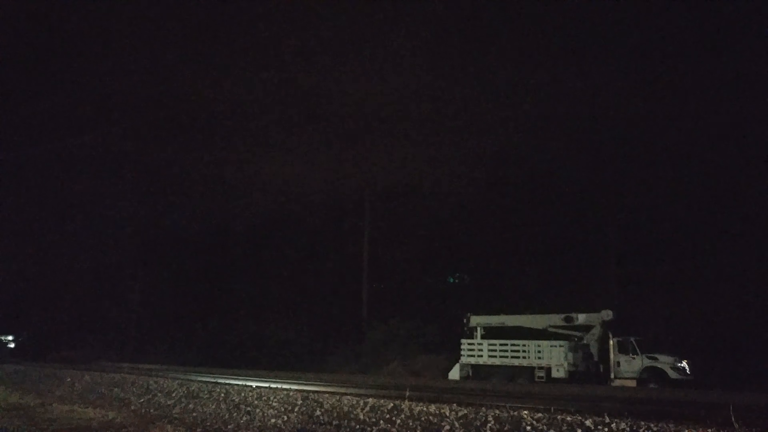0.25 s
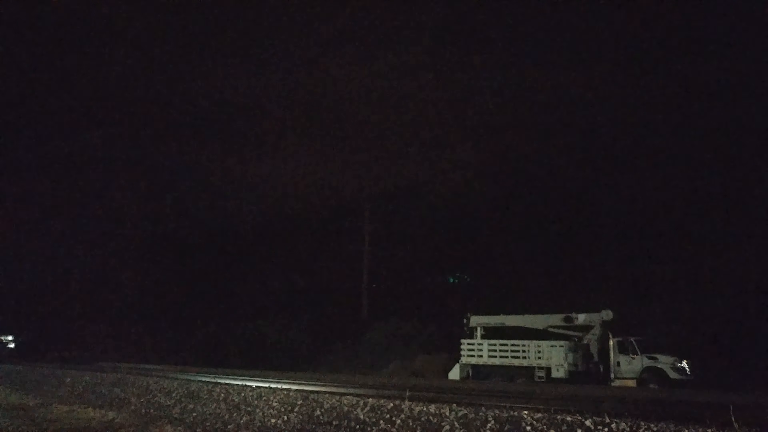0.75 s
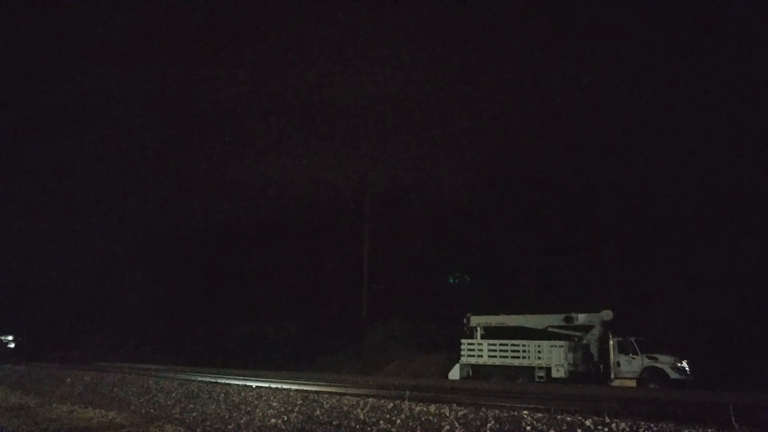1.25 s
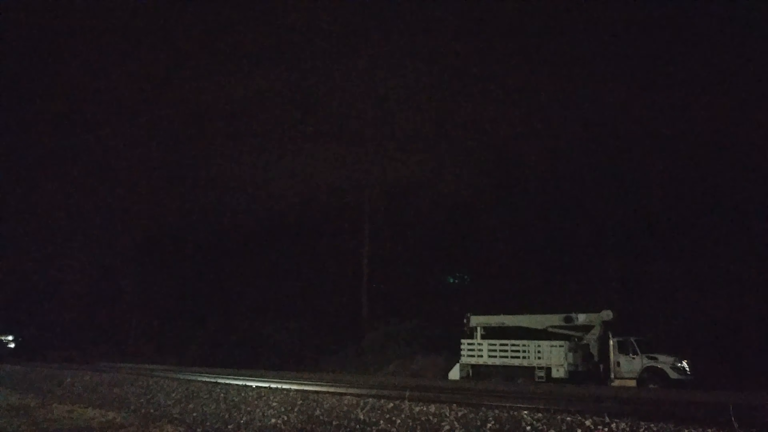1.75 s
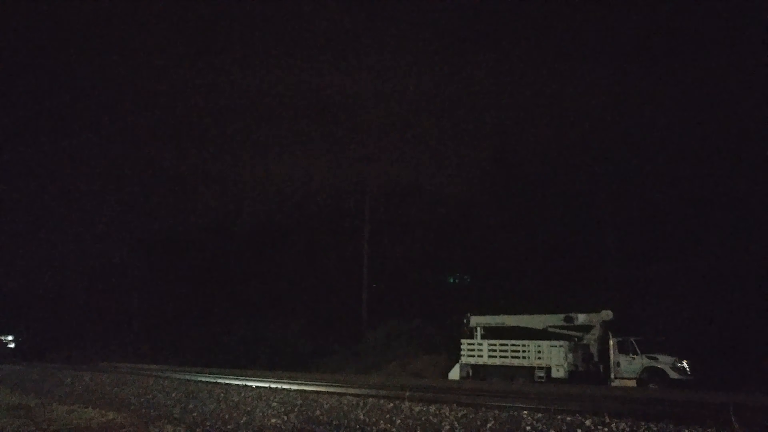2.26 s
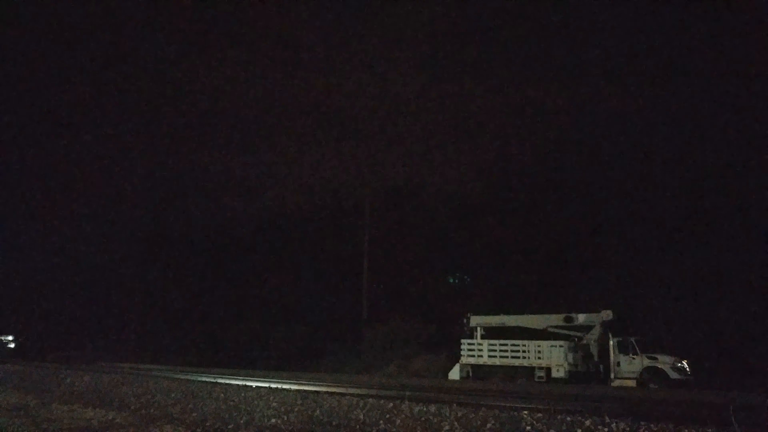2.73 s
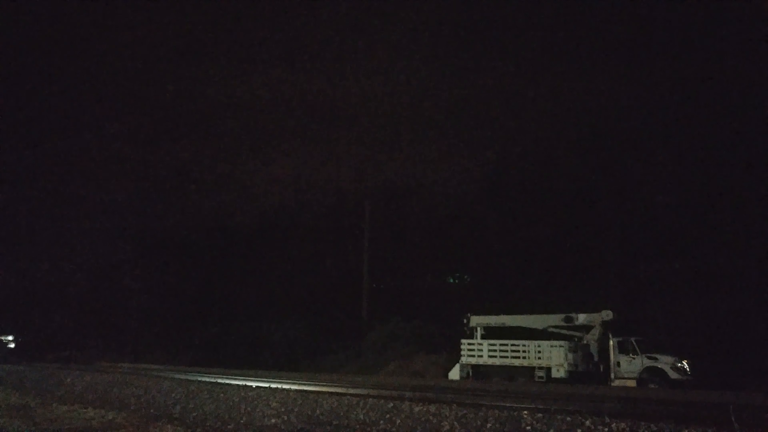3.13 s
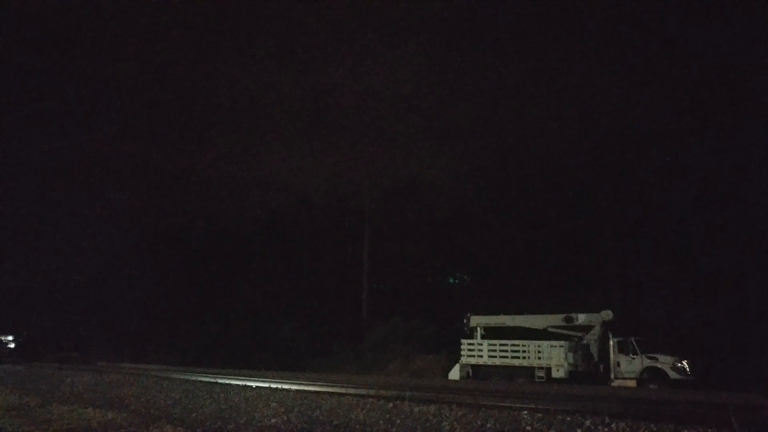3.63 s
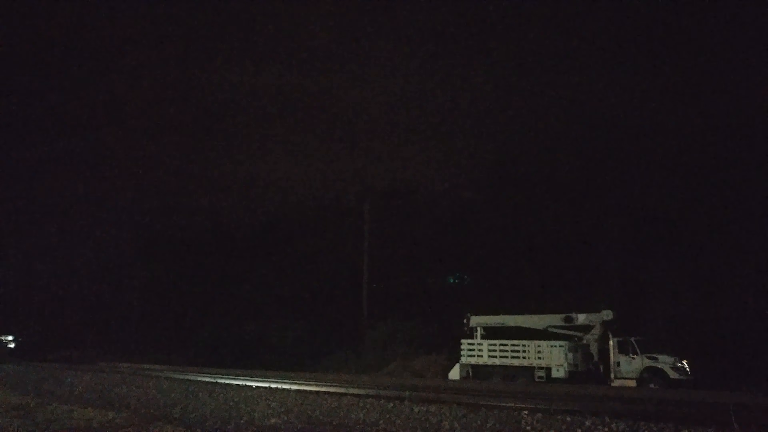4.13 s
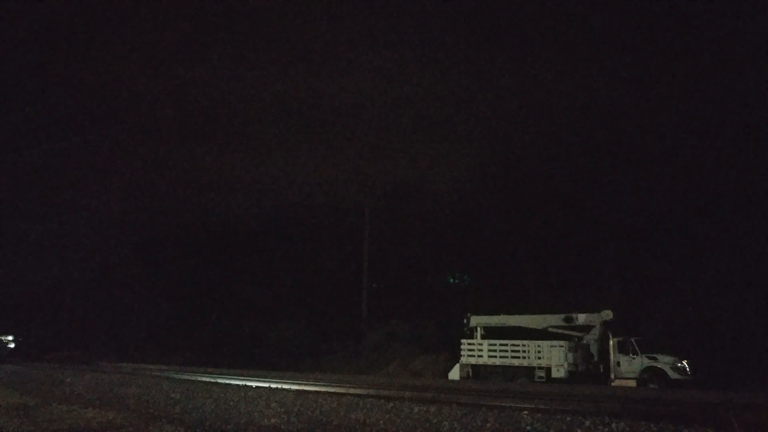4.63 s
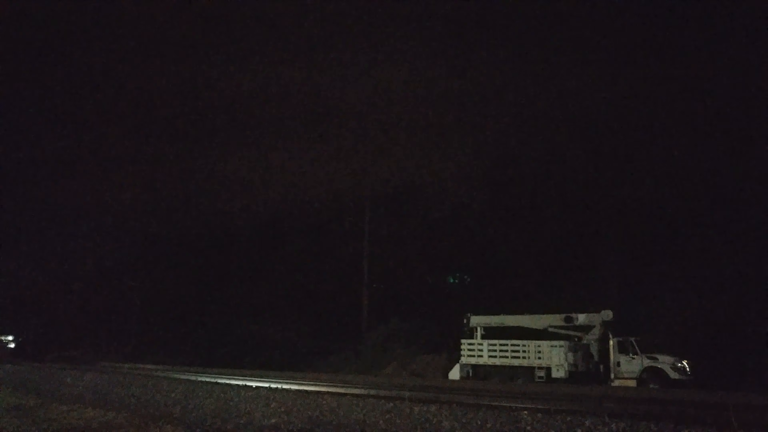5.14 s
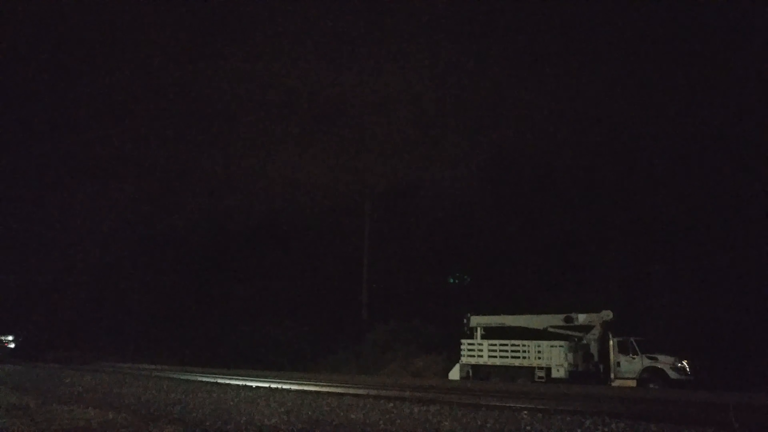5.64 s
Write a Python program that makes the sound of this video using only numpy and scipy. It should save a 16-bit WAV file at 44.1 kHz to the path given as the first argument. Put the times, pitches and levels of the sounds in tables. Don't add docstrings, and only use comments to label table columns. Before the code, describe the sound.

Deep rapid diesel throbbing from a distant rail machine, wavering hum and grinding hiss around it, heard almost only on the right.

```python
import sys
import numpy as np
from scipy import signal
from scipy.fft import rfft, irfft, next_fast_len
from scipy.io import wavfile
from scipy.ndimage import uniform_filter1d, map_coordinates

SR = 44100
rng = np.random.default_rng(int(sys.argv[2]) if len(sys.argv) > 2 else 0)


def attenuation_scalar(level_db):
    decades = np.asarray(level_db, float) / 20
    return 10 ** decades


def wav_out(sig):
    wavfile.write(sys.argv[1], SR, np.round(np.clip(np.atleast_2d(sig).T, -1, 1) * 32767).astype(np.int16))


N = 259244

# order/crank rate, level/dB
PIPE_LINES = [(9, -59), (12, -55), (14, -56.5), (16, -52.5), (19, -61), (24, -53.5), (25, -60), (26, -59.5)]
# order/crank rate, level/dB, sign
PULSE_LINES = [(3, -43, 1), (6, -48, -1), (7, -43, 1), (8, -44.5, -1)]
# beat/Hz, first in step t/s, level/dB
ABOVE_FOURTH = [(2.3, 0.033, -39.5), (.82, .92, -44.5)]
# beat/Hz, first in step t/s, level/dB
BELOW_FIFTH = (-5.5, 0.031, -51)
# t/s, half length/s, rise/dB
FIFTH_RISES = [(.15, 0.33, -2), (.62, .07, 2), (.94, .07, -2.5), (1.1, 0.059, 3.5), (1.8, 0.2, 2),
               (2.45, 0.21, 1), (3.1, 0.19, 1.5), (3.85, 0.049, 1.5), (4.0, 0.066, -1.5),
               (4.45, 0.11, -4.5), (5.2, .3, 1)]
# t/s, half length/s, rise/dB
FOURTH_RISES = [
    (1.75, .15, -2.5),
    (2.78, .12, -5),
    (3.45, .25, 1),
    (3.85, .1, -3.5),
    (4.5, .3, 0.6),
    (5.45, .1, -2),
]
# f/Hz, density/dB per Hz
ROAR_SPECTRA = [
    [(15, -20.5), (33, -20.5), (42, -7.5), (66, -5.5), (92, -4), (108, -0.5), (130, -5), (170, -26.5),
     (400, -120)],
    [(60, -120), (110, -22), (145, 1), (240, 0), (330, -6), (420, -10.5), (600, -25), (1500, -120)],
]
# t/s, half length/s, rise/dB
LOW_ROAR_RISES = [
    (.6, .2, 2),
    (1.45, .12, 3.5),
    (2.2, .2, 3),
    (2.85, 0.13, 4),
    (3.65, 0.09, 4),
    (4.05, 0.054, 6),
    (4.33, 0.092, 6),
    (4.7, .1, 2.5),
    (5.5, 0.22, 2.5),
]
# t/s, half length/s, rise/dB
HIGH_ROAR_RISES = [
    (.3, .45, 2.5),
    (1.52, .08, 2.5),
    (2.4, 0.17, 2),
    (3.2, .15, 2),
    (3.7, .15, 1),
    (4.37, .12, 1.5),
    (5.2, 0.36, 1.5),
]
STRAND_LINES = [17, 21, 52, 55]
# t/s, half length/s, rise/dB
STRAND_RISES = [
    [(.15, 0.17, 12.5), (.75, .3, 7.5), (1.4, .15, 3), (3.75, 0.13, 9.5), (4.3, .4, 11.5)],
    [(.15, 0.13, 6.5), (3.2, .3, 4), (4.4, .2, 7.5), (5.35, .3, 7.5)],
    [(1.07, 0.079, 15), (1.9, .4, 3.5), (5.65, .15, 7.5)],
    [(1.25, 0.13, 11), (1.8, .18, 13.5), (3.25, 0.11, 7), (4.52, .1, 11.5), (5.2, .15, 6), (5.6, .1, 6.5)],
]
# order/crank rate, level over hum/dB
CASING_LINES = [
    [(53, -11.5), (54, -11), (58, -12.5), (59, -14), (60, -13.5)],
    [(66, -12.5), (67, -7), (68.5, -5.5), (69, -8)],
    [(83, -15), (84.4, -10), (85.3, -13.5)],
]
# f/Hz, width/Hz, level/dB
CASING_MODES = [
    [(698.6, 22, -6), (787.3, 50, 0.5), (868, 60, -2)],
    [(984, 26, 1), (1022, 39, 1)],
    [(1149, 34, -7), (1233, 44, 0.5), (1274, 40, -1.5), (1401, 96, -8.5)],
]
CASING_LEVELS_DB = [-48.5, -51, -47]
# t/s, half length/s, rise/dB
CASING_RISES = [
    [(.05, 0.09, 8.5), (.36, .08, 9), (.65, .12, 5), (1.25, .25, 10), (1.75, 0.19, 6), (2.4, .25, 6.5),
     (3.2, 0.1, 3.5), (3.95, .08, -7), (4.2, 0.087, 3.5), (4.53, 0.081, 8.5), (5.3, 0.31, 4.5)],
    [(.3, 0.28, 5.5), (.72, 0.22, 6.5), (1.85, 0.1, 4.5), (2.45, .2, 10), (3.2, .25, 4.5), (3.75, .1, 3.5),
     (4.5, .1, 2.5), (5.1, .15, 5), (5.65, .2, 6)],
    [(.45, 0.092, 3), (.8, 0.22, -3.5), (1.35, 0.22, 4.5), (2.1, 0.23, 5.5), (3.6, .3, 3.5),
     (4.12, 0.11, 3.5), (4.5, .1, 4), (4.95, .2, 5.5), (5.8, 0.11, 7.5)],
]
# t/s, level/dB
STONE_PRESSURE = [(0.0, -42.5), (0.82, -47.5), (1.52, -44), (1.69, -47.5), (2.03, -44.5), (2.93, -49),
                  (3.0, -46), (3.32, -49.5), (3.42, -46.5), (4.21, -45.5), (4.24, -48), (5.29, -45.5),
                  (5.4, -47), (5.88, -42.5)]
# f/Hz, density/dB per Hz
GRIND_SPECTRA = [
    [(100, -120), (300, -25), (450, -6), (700, -1), (1150, 0), (1330, -3.5), (2000, -8.5), (2600, -21.5),
     (5000, -91)],
    [(800, -120), (1700, -10.5), (2300, -1), (3000, -3), (4200, -23.5), (6000, -61)],
]
# t/s, half length/s, rise/dB
STONE_BITES = [
    (1.55, 0.06, 2.5),
    (4.2, 0.036, 1.5),
    (5.68, 0.059, 1.5),
]
# f/Hz, density/dB per Hz
FAN_SPECTRUM = [(1500, -120), (3500, -3), (4200, -2.5), (5400, -3), (7000, -19.5), (10000, -55.5)]
# f/Hz, width/Hz, level/dB
SCRAPE_MODES = [(1780, 380, 0)]
# f/Hz, width/Hz, level/dB
FAR_ENGINE_MODES = [(41, 2.5, 0), (69, 4, -5), (234.6, .6, 0)]
# t/s, peak level/dB
PEBBLE_TICKS = [
    (3.9337, -54),
]
# f/Hz, gain/dB
BLOCKED_PORT = [(40, -25), (300, -25), (500, -28.5), (1000, -30), (1300, -30.5), (2000, -36.5), (4000, -41)]
# f/Hz, density/dB per Hz
BODY_SPECTRUM = [(20, -120), (40, -39), (120, -5.5), (300, -3), (500, -1), (1100, -2.5), (2000, -6),
                 (3000, -13.5), (4000, -19), (7000, -36), (12000, -90.5)]
# f/Hz, density/dB per Hz
AMPLIFIER_SPECTRUM = [(1000, 5), (5000, 1.5), (7300, 4), (8800, 2.5), (10500, -3.5), (13000, 1), (15000, 1),
                      (16500, -2.5)]
# f/Hz, width/Hz, level/dB
WHINE_MODES = [(8200, 240, 0)]

CRANK_HZ, FIRST_THROB_S = 14.757, .030
FIFTH_DB, FADE_DB_PER_S = -23, 1.03
TIME_S = np.arange(N) / SR


def unit(x):
    return x / np.sqrt(np.mean(x ** 2) + 1e-20)


def spectrum(points):
    f, db = np.transpose(points)
    return lambda hz: attenuation_scalar(np.interp(np.log(hz + 1), np.log(f + 1), db))


def resonances(modes):
    def response(f):
        total = 0
        for k, (centre, width, db) in enumerate(modes):
            damping = 1j * f * width
            total = total + (-1) ** k * attenuation_scalar(db) * (damping / (centre ** 2 - f ** 2 + damping)) ** 2
        return total
    return response


def filtered(x, response):
    m = next_fast_len(N + SR // 2)
    return irfft(rfft(x, m) * response(np.fft.rfftfreq(m, 1 / SR)), m)[..., :N]


def rush(response, patchy_db):
    z = signal.stft(rng.standard_normal(N + 1024), nperseg=1024)[2]
    field = uniform_filter1d(rng.standard_normal(z.shape), size=8, axis=0)
    field = unit(uniform_filter1d(field, size=10, axis=1))
    noise = signal.istft(z * attenuation_scalar(patchy_db * field), nperseg=1024)[1][:N]
    return unit(filtered(noise, response))


def wobble(rate_hz):
    coarse = np.arange(0, N + 128, 128)
    knots = rng.standard_normal(int(N * rate_hz / SR) + 4)
    return np.interp(np.arange(N), coarse, map_coordinates(knots, [coarse * rate_hz / SR]))


def swells(rows):
    coarse_s = np.arange(0, N + 128, 128) / SR
    rise_db = sum(db * np.exp(-.5 * ((coarse_s - s) / half_s) ** 2) for s, half_s, db in rows)
    return np.interp(TIME_S, coarse_s, rise_db)


def orders(table, crank, flutter_db, drift_rad):
    total = np.zeros(N)
    for k, db in table:
        level = attenuation_scalar(db + flutter_db * wobble(4))
        phase = k * crank + rng.uniform(0, 2 * np.pi) + drift_rad * np.sqrt(k) * wobble(2.494)
        total += level * np.sqrt(2) * np.cos(phase)
    return total


def beating(beat_hz, in_step_s, db):
    return attenuation_scalar(db) * np.exp(2j * np.pi * beat_hz * (TIME_S - in_step_s))


def exhaust(crank):
    fade_db, low_db = -FADE_DB_PER_S * TIME_S, swells(LOW_ROAR_RISES)
    pipe_lag_rad = 1.1
    fourth = attenuation_scalar(FIFTH_DB + 2.25 + 0.99 * fade_db + swells(FOURTH_RISES))
    fourth = fourth + sum(beating(*row) for row in ABOVE_FOURTH)
    fifth = attenuation_scalar(FIFTH_DB + fade_db + swells(FIFTH_RISES)) + beating(*BELOW_FIFTH)
    fourth_phase = 4 * crank + pipe_lag_rad + 0.046 * wobble(2.5)
    fifth_phase = 5 * crank + pipe_lag_rad + 0.05 * wobble(4.4)
    throb = np.real(fourth * np.exp(1j * fourth_phase) + fifth * np.exp(1j * fifth_phase))

    pulse = np.zeros(N)
    for k, db, sign in PULSE_LINES:
        level = sign * attenuation_scalar(db + 1.8 * wobble(4.3))
        pulse += level * np.cos(k * crank + pipe_lag_rad + 0.39 * wobble(2.5))

    low = attenuation_scalar(low_db - 38.5) * rush(spectrum(ROAR_SPECTRA[0]), patchy_db=0.6)
    high_db = -38 + .55 * fade_db + swells(HIGH_ROAR_RISES)
    high = attenuation_scalar(high_db) * rush(spectrum(ROAR_SPECTRA[1]), patchy_db=0.65)
    lines = orders(PIPE_LINES, crank, flutter_db=2.24, drift_rad=0.078)
    lines = attenuation_scalar(2.5 + 0.52 * fade_db) * lines
    return np.sqrt(2) * (throb + attenuation_scalar(1.3 * low_db - 0.9) * pulse) + low + high + lines


def strands(crank):
    total = np.zeros(N)
    for rows, k in zip(STRAND_RISES, STRAND_LINES):
        line = orders([(k, -.4)], crank, flutter_db=0.8, drift_rad=0.04)
        total += attenuation_scalar(-54.5 + swells(rows)) * line
    return total


def casing(crank):
    total = np.zeros(N)
    for db, rows, modes, table in zip(CASING_LEVELS_DB, CASING_RISES, CASING_MODES, CASING_LINES):
        hum = rush(resonances(modes), patchy_db=2.0)
        lines = orders(table, crank, flutter_db=2.5, drift_rad=0.083)
        total += attenuation_scalar(db + swells(rows)) * (hum + lines)
    return total


def grinding():
    s, db = np.transpose(STONE_PRESSURE)
    press_db = np.interp(TIME_S, s, db)
    press_db = press_db - press_db.mean()
    dull = attenuation_scalar(.6 * press_db - 38.5) * rush(spectrum(GRIND_SPECTRA[0]), patchy_db=0.36)
    bright_db = 1.1 * press_db + swells(STONE_BITES) - 51.5
    bright = attenuation_scalar(bright_db) * rush(spectrum(GRIND_SPECTRA[1]), patchy_db=1.5)
    fans = attenuation_scalar(-71.5) * rush(spectrum(FAN_SPECTRUM), patchy_db=1.4)
    return dull + bright + fans


def scrape():
    start_s, rise_s, t60_s, level_db = 5.61, .03, 1.8, -49.5
    since_s = np.clip(TIME_S - start_s, 0, None)
    envelope = attenuation_scalar(level_db - 60 * since_s / t60_s) * (1 - np.exp(-since_s / rise_s))
    return envelope * rush(resonances(SCRAPE_MODES), patchy_db=0.0)


def far_engine():
    return attenuation_scalar(-43) * rush(resonances(FAR_ENGINE_MODES), patchy_db=-1.3)


def tick():
    blows = np.zeros(N)
    for s, db in PEBBLE_TICKS:
        decay = attenuation_scalar(-60 * np.arange(300) / SR / .012)
        blows[round(s * SR):][:300] = attenuation_scalar(db + 6.5) * rng.standard_normal(300) * decay
    return filtered(blows, resonances([(5300, 2300, 0)]))


def blocked_port(right):
    lag_s, gain = .00027, spectrum(BLOCKED_PORT)
    leak = filtered(right, lambda hz: gain(hz) * np.exp(-2j * np.pi * hz * lag_s))
    return leak + attenuation_scalar(-58.0) * rush(spectrum(BODY_SPECTRUM), patchy_db=.6)


def amplifier_hiss():
    gain = spectrum(AMPLIFIER_SPECTRUM)
    hiss = [rush(lambda hz: gain(hz) * (hz > 900), patchy_db=1.5) for _ in range(2)]
    return attenuation_scalar([[-75], [-73.5]]) * np.array(hiss)


def whine():
    return attenuation_scalar([[-84], [-91]]) * [[1], [-1]] * rush(resonances(WHINE_MODES), patchy_db=-1.5)


def scene():
    crank = 2 * np.pi * CRANK_HZ * (TIME_S - FIRST_THROB_S)
    train = exhaust(crank) + strands(crank) + casing(crank) + grinding() + scrape()
    right = attenuation_scalar(5.5) * (train + far_engine() + tick())
    return np.array([blocked_port(right), right])


def roll_off(x):
    return signal.sosfilt(signal.butter(12, 15760, fs=SR, output="sos"), x)


def record(dry):
    mix = dry + amplifier_hiss() + whine()
    return roll_off(mix)


dry = scene()
out = record(dry)
wav_out(out)
```